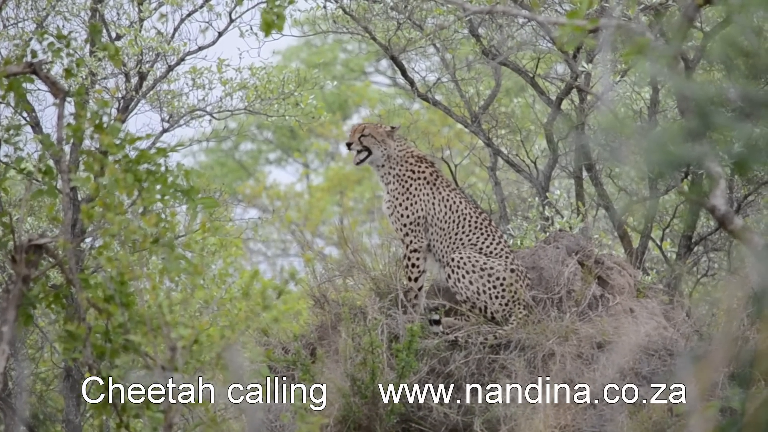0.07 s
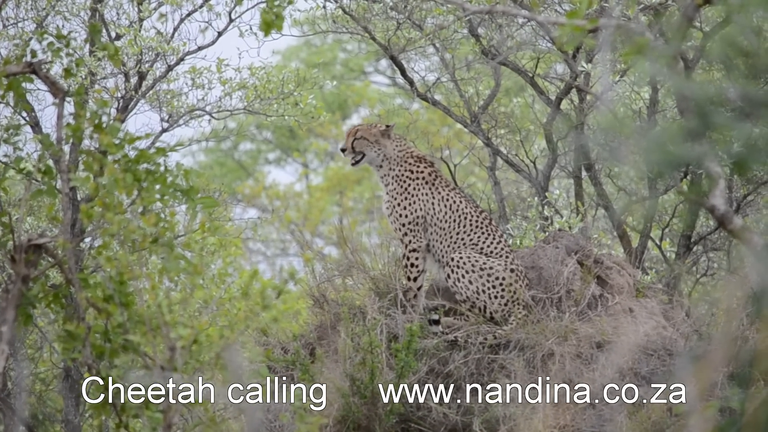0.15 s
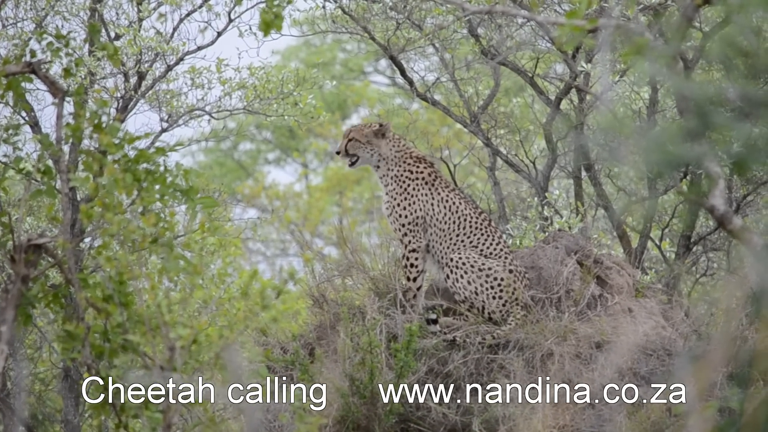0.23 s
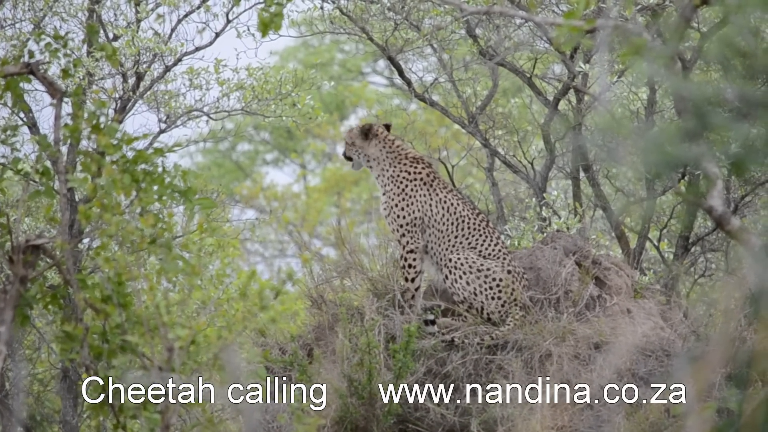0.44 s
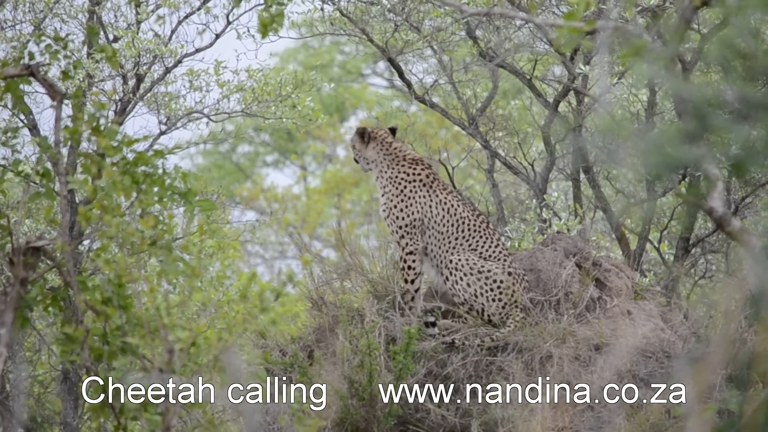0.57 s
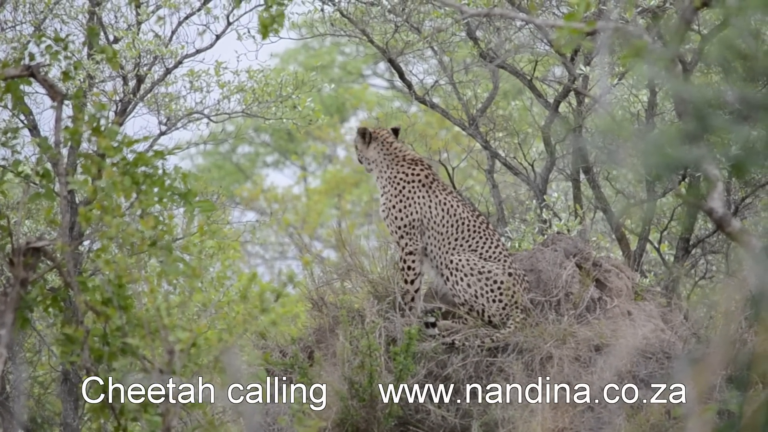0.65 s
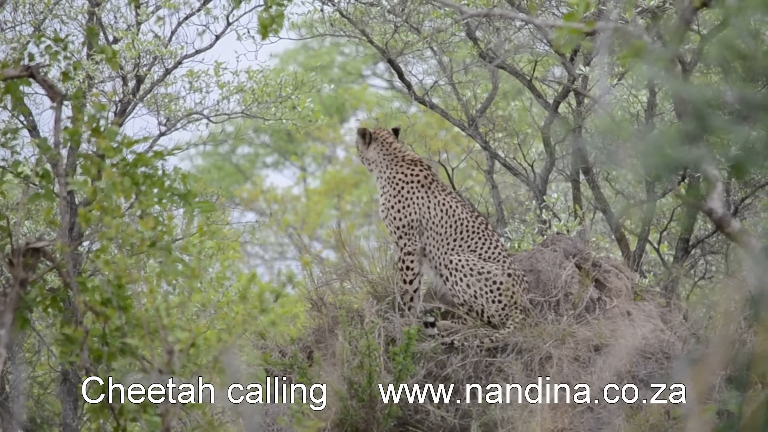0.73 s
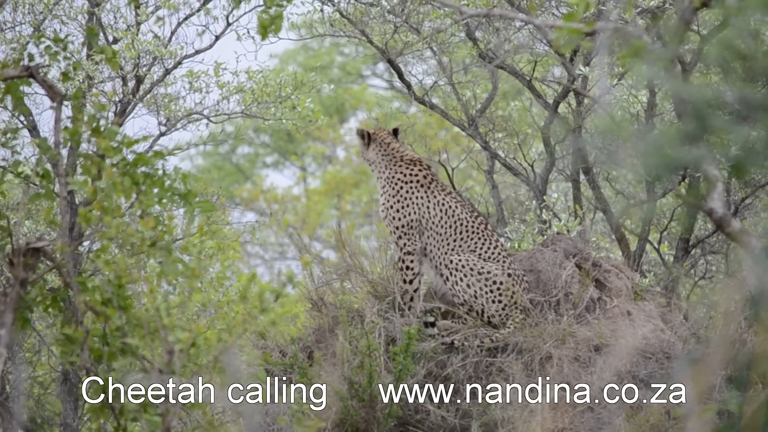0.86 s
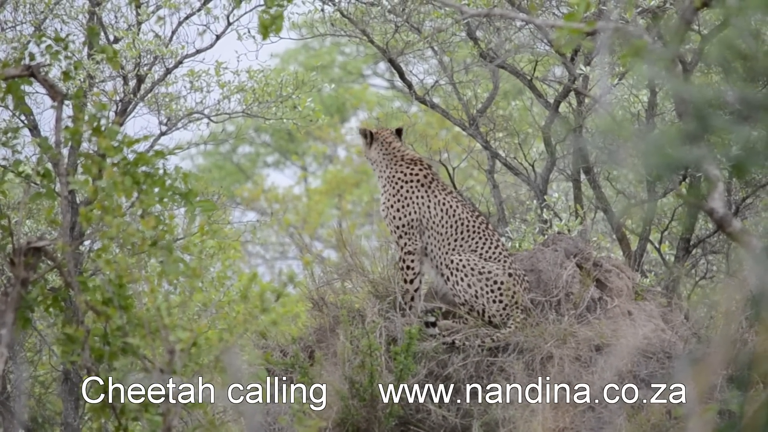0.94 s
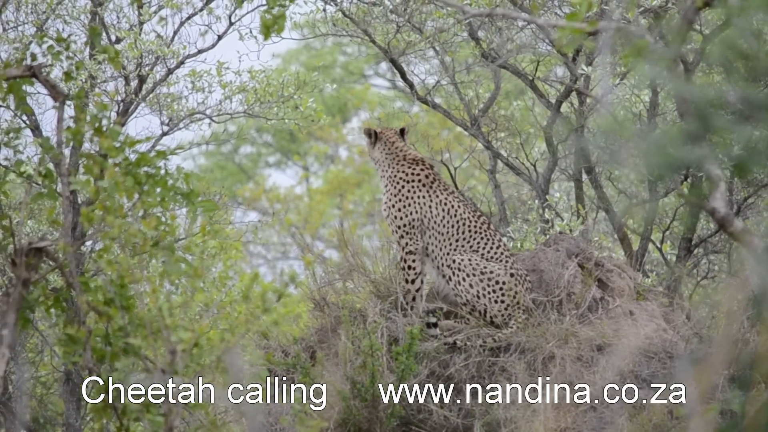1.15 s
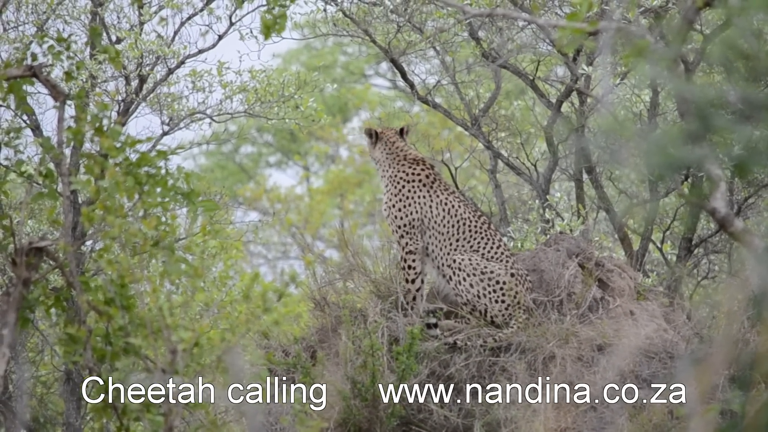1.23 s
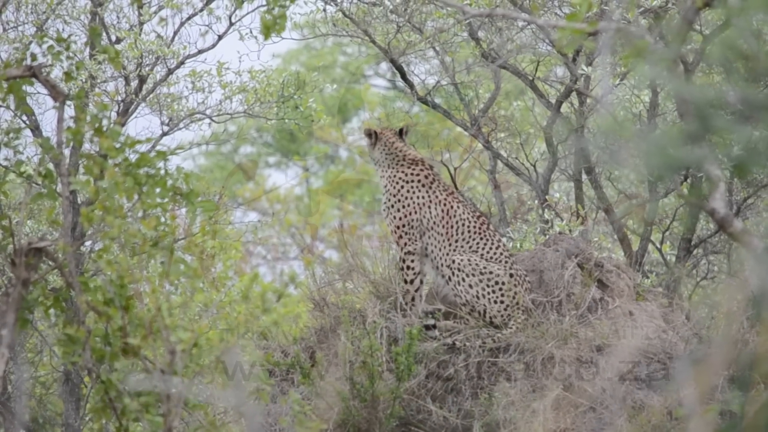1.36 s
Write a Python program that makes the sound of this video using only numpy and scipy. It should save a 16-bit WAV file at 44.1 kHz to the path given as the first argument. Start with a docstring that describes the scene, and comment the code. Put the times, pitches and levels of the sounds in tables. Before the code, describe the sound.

A cheetah gives one brief, high chirp that rises, falls and turns hoarse, with a slight echo from the trees. Much fainter, a small bird repeats a thin rising note over a steady outdoor hush and low hum.

```python
"""Cheetah chirp in the bush

From a mound, a cheetah gives one high, arching chirp: a clean voice shaped by its throat,
turning hoarse as it falls. The trees throw it back to a single microphone. Much fainter,
a small bird repeats a thin rising note over a steady outdoor hush and a low, wavering hum."""
import sys
import numpy as np
from scipy import signal
from scipy.fft import rfft, irfft
from scipy.io import wavfile
from scipy.ndimage import uniform_filter1d, minimum_filter1d

SR = 44100
rng = np.random.default_rng(int(sys.argv[2]) if len(sys.argv) > 2 else 0)


def dump(signal):
    """Clip the signal to [-1, 1] and save it as 16-bit WAV at the path in sys.argv[1]."""
    limited = np.clip(np.atleast_2d(signal).T, -1, 1)
    pcm = np.round(limited * 32767).astype(np.int16)
    wavfile.write(sys.argv[1], SR, pcm)


N = 61739
TIME = np.arange(N) / SR


def from_db(db):
    """Decibels to gain."""
    return 10 ** (np.asarray(db) / 20)


def rms_one(x):
    """Scale to an rms of one."""
    return x / np.sqrt(np.mean(x ** 2) + 1e-20)


def in_time(rows):
    """A control curve at every sample."""
    return np.interp(TIME, *np.transpose(rows))


def at_hz(spectrum, hz):
    """Read a spectrum's decibels on a log-frequency axis."""
    points_hz, db = np.transpose(spectrum)
    return np.interp(np.log(np.maximum(hz, 1)), np.log(points_hz), db)


def coloured_noise(spectrum):
    """Noise with the given spectral shape; rms 1."""
    hz = np.arange(N + 1) * SR / (2 * N)
    white = rfft(rng.standard_normal(2 * N))
    return rms_one(irfft(white * from_db(at_hz(spectrum, hz)))[:N])


def drift(rate_hz):
    """Random wander: noise through two one-pole low-passes, already settled; rms 1."""
    pole = np.exp(-2 * np.pi * rate_hz / SR)
    wander = signal.lfilter([1], [1, -2 * pole, pole * pole], rng.standard_normal(2 * N))
    return rms_one(wander[N:])


# The open air all around the microphone: frequency_hz, relative_density_db
AIR_SPECTRUM = [(14, -41), (26, 9.5), (45, -3.5), (85, -6), (130, 0.5), (180, -5.5), (370, 1), (550, -1),
                (680, -1), (900, -3), (1400, -3), (2600, -7), (3800, -14.5), (5600, -17.5), (7000, -21.5),
                (7900, -29.5), (9600, -26.5), (10600, -36), (11500, -50)]

def hush(level_db=-31.5, flicker_db=.6):
    """Steady broad noise of the open air, its level flickering slightly."""
    return from_db(level_db + flicker_db * drift(rate_hz=19)) * coloured_noise(AIR_SPECTRUM)


# Tones of the hum in the distance: pitch_hz, width_hz, level_db
HUM_TONES = [(55, 5.8, -37.5), (208, 15.4, -48), (251.4, 3.4, -44), (320.3, 8.9, -48), (392.8, 9.6, -49.5),
             (653, 43, -42), (798.7, 11.7, -45.5), (1321, 12, -47)]

def hum():
    """Narrow, wavering tones, as of a far-off engine."""
    out = np.zeros(N)
    for pitch_hz, width_hz, level_db in HUM_TONES:
        phase = 2 * np.pi * pitch_hz * TIME
        out += from_db(level_db) * (drift(width_hz) * np.cos(phase) + drift(width_hz) * np.sin(phase))
    return out


def echo(x, delay_s, level_db):
    """One distinct reflection off wood, reaching the microphone after the direct sound."""
    return from_db(level_db) * np.interp(TIME - delay_s, TIME, x, left=0)


def foliage(x, delay_s, t60_s, level_db):
    """Countless faint reflections from twigs and leaves, dying away."""
    age = TIME - delay_s
    tail = rng.standard_normal(N) * (age > 0) * from_db(-60 * np.maximum(age, 0) / t60_s)
    return from_db(level_db) * signal.fftconvolve(x, tail / np.linalg.norm(tail))[:N]


# The bird's notes, off among the branches: start_s, level_db, top_pitch_hz
BIRD_NOTES = [(.040, -48.5, 7000), (.259, -46, 7140), (0.472, -44, 7170), (0.686, -47.5, 7060),
              (0.899, -44.5, 6860), (1.118, -48, 6970), (1.333, -45.5, 6870)]

def bird(start_hz=3900, rise_s=.04, attack_s=.006, length_s=.067, release_s=.02):
    """Each note is a whistle that sweeps up quickly and levels off."""
    out = np.zeros(N)
    for start_s, level_db, top_pitch_hz in BIRD_NOTES:
        age = TIME - start_s
        climb = 1 - np.clip(1 - age / rise_s, 0, 1) ** 2.4
        waver = 1 + .0042 * drift(rate_hz=150)
        hz = (start_hz + (top_pitch_hz - start_hz) * climb) * waver
        envelope = np.clip(age / attack_s, 0, 1) * np.clip((length_s - age) / release_s, 0, 1)
        gain = from_db(level_db + 1.5 * (.5 - climb))   # weakens by 1.5 dB as it climbs
        out += gain * envelope * np.sin(2 * np.pi * np.cumsum(hz) / SR)
    return out


# The arch of the chirp from the mound: time_s, pitch_hz
CHIRP_PITCH = [(.192, 771), (.207, 815.2), (.215, 900), (.224, 1000), (.233, 1041), (.241, 1057),
               (.252, 1030), (.261, 1008), (.271, 958.3), (.281, 899), (.290, 849.5), (.297, 837),
               (.304, 797.6), (.316, 782), (.324, 754), (.345, 653)]
# How hard the cheetah pushes: time_s, level_db
CHIRP_EFFORT = [(.190, -28), (.198, -18), (.211, -18), (.219, -7.5), (.228, -2.5), (.24, -1), (.251, 1.5),
                (.262, 4.5), (.275, -5.5), (.286, -5), (.292, -12), (.302, -11), (.315, -21), (.323, -32.5),
                (.339, -19), (.355, -38)]
# How hoarse its voice is: time_s, roughness_0_to_1
CHIRP_HOARSENESS = [(.212, 0.9), (.224, 0), (.264, 0.08), (.273, 0.9), (.292, 0.4), (.303, 0.3)]
# Its harmonics before the throat, from the fundamental up: level_db
VOICE_HARMONICS = [1.5, 2.5, 1.5, -4.5, -9, -4.5, -4, -4.5, -5, -5]
# What throat and open mouth let through: frequency_hz, gain_db
THROAT_RESPONSE = [(680, -53), (790, -32), (860, -16.5), (950, -13.5), (1060, -17.5), (1350, -10),
                   (1600, -5.5), (1800, -16), (2050, -13.5), (2400, -24.5), (2700, -8.5), (2860, -18.5),
                   (3060, -7.5), (3250, -15), (3450, -7), (3600, -21.5), (3830, -9), (4100, -24),
                   (4220, -14.5), (4600, -29), (5400, -30), (6130, -25.5), (6500, -44), (8400, -44.5),
                   (10500, -50), (11600, -70)]

def cheetah(rasp_db=-27):
    """Harmonics slide through the throat's resonances: rough at the onset, clean on top, then hoarse."""
    pitch_hz, hoarse = in_time(CHIRP_PITCH), in_time(CHIRP_HOARSENESS)
    jitter = 1 + (.002 + .011 * hoarse) * drift(rate_hz=250)
    phase = 2 * np.pi * np.cumsum(pitch_hz * jitter) / SR
    # Where the voice is hoarse, air noise pulses with each cycle.
    voice = from_db(rasp_db) * coloured_noise(THROAT_RESPONSE) * (1 + np.cos(phase)) * hoarse
    for k, level_db in enumerate(VOICE_HARMONICS, 1):
        gain = from_db(level_db + at_hz(THROAT_RESPONSE, k * pitch_hz))
        shimmer = 1 + (.025 + .28 * hoarse) * drift(rate_hz=110)
        voice += gain * shimmer * np.sin(k * phase + k * k * np.pi / 2)   # harmonics out of step
    calling = (TIME > CHIRP_EFFORT[0][0]) & (TIME < CHIRP_EFFORT[-1][0])
    return voice * from_db(in_time(CHIRP_EFFORT)) * calling


def scene():
    """At the microphone, in mono: the cheetah mostly direct, the bird mostly by way of the leaves."""
    chirp, notes = cheetah(), bird()
    nearest_trunk = echo(chirp, delay_s=.030, level_db=-24)
    chirp_scatter = foliage(chirp, delay_s=.012, t60_s=.26, level_db=-16)
    branch_by_bird = echo(notes, delay_s=.016, level_db=-17)
    bird_scatter = foliage(notes, delay_s=.0029, t60_s=.079, level_db=2.5)
    background = hush() + hum() + notes + branch_by_bird + bird_scatter
    return (background + chirp + nearest_trunk + chirp_scatter)[None]


def record(dry):
    """Behind the microphone, a steep low-pass cuts the top and a gentle limiter holds any high peaks."""
    cutoff_hz, ceiling, limiter_s = 11590, .88, .004
    filtered = signal.sosfilt(signal.ellip(12, .1, 80, cutoff_hz, fs=SR, output="sos"), dry)
    span = int(limiter_s * SR)
    gain = minimum_filter1d(ceiling / np.maximum(np.abs(filtered), ceiling), size=span)
    return filtered * uniform_filter1d(gain, size=span)


dry = scene()
out = record(dry)
dump(out)
```